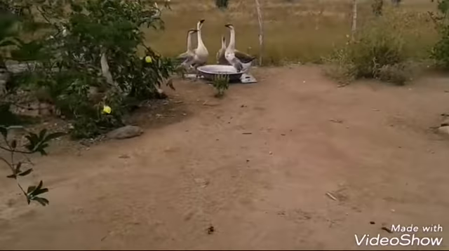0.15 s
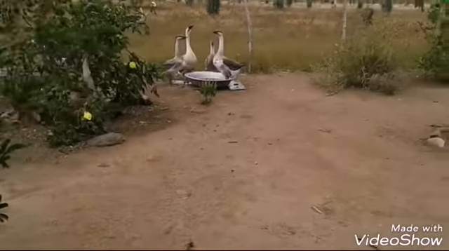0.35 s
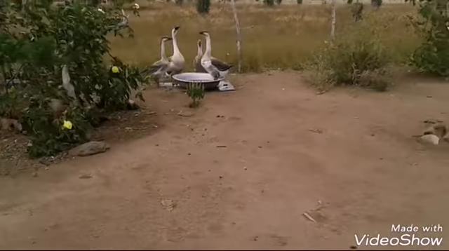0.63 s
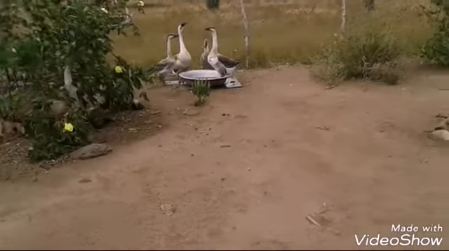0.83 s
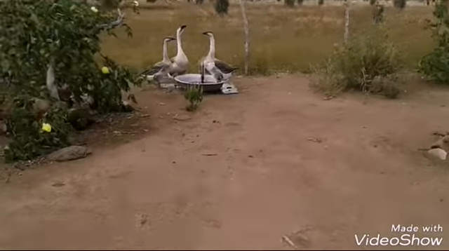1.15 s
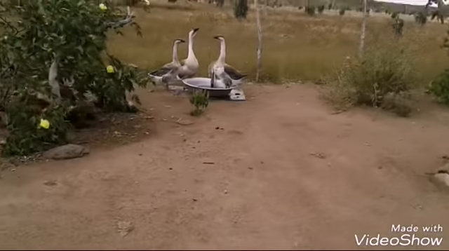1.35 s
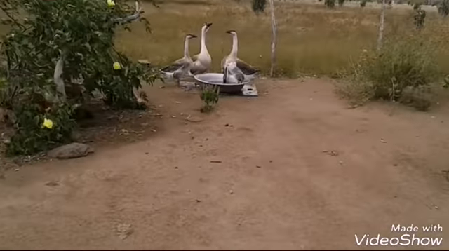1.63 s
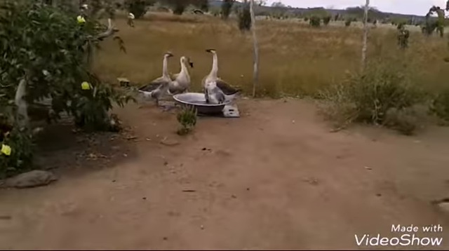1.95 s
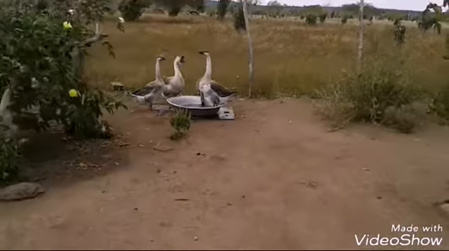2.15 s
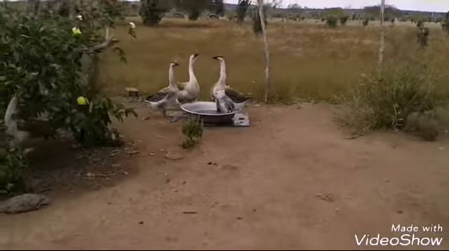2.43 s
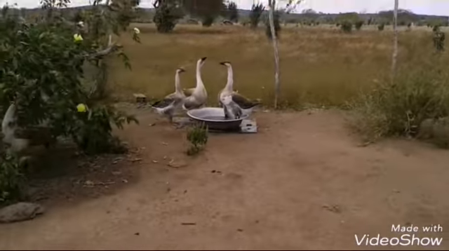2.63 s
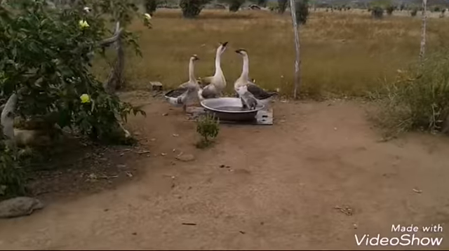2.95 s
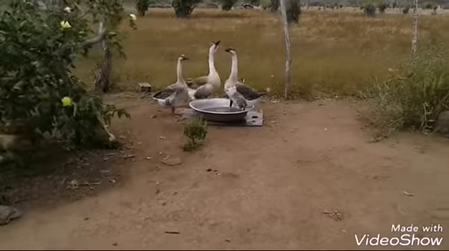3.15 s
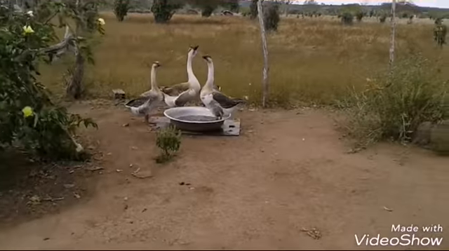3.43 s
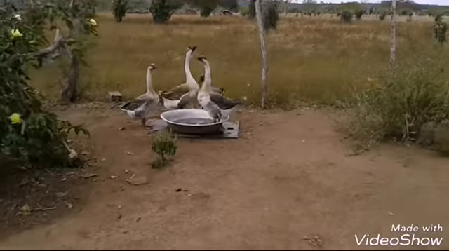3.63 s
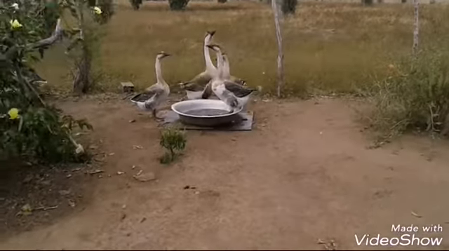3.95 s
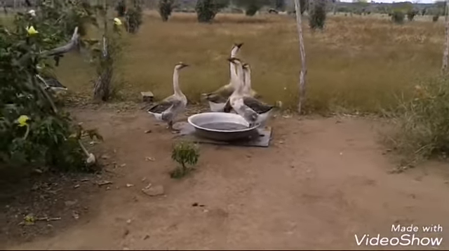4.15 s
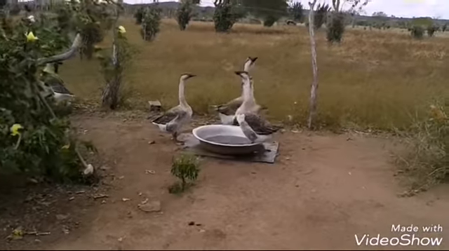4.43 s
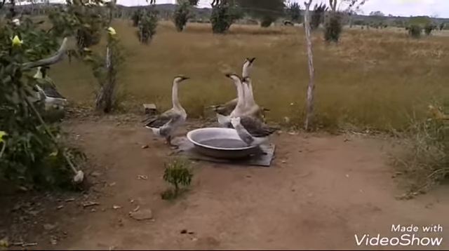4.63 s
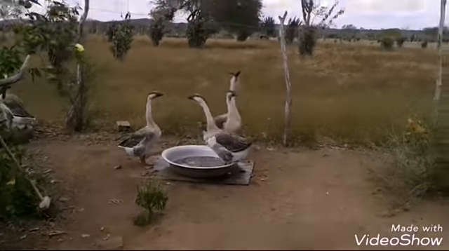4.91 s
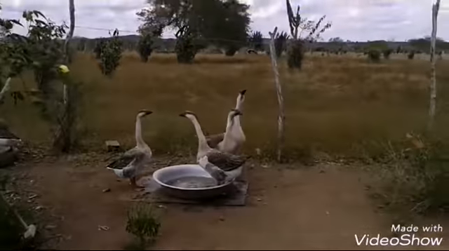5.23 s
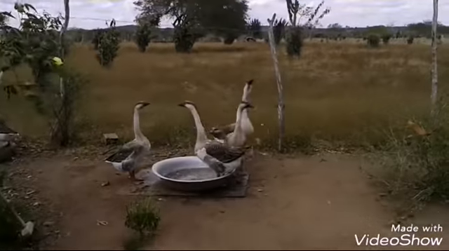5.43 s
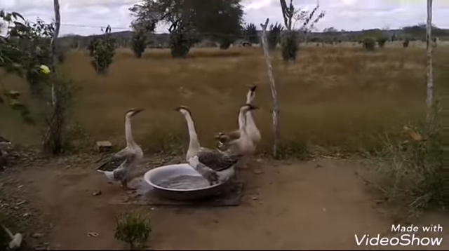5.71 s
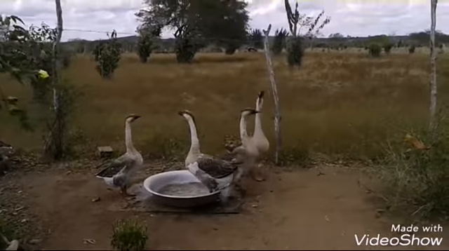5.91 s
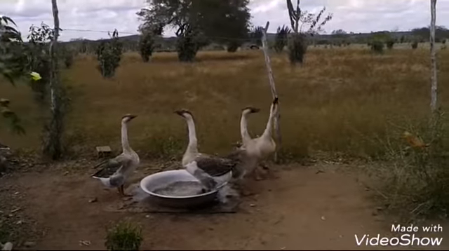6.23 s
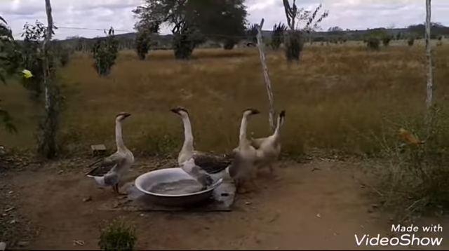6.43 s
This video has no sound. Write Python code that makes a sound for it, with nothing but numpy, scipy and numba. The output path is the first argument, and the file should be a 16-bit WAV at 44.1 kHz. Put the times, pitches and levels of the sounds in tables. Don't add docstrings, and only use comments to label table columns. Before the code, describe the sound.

Outdoor hand-held pickup, walking toward geese. Two isolated buzzy honks, a pause with crunching steps and wind bumps, then honks and clear brassy calls in quick overlapping clusters, with soft closed-beak murmurs between. The strongest trumpet call and hoarse honks come near the end. Sharp dry clicks underfoot stay close; the voices have short dull reflections and no long reverberation.

```python
import sys
import numpy as np
from scipy import signal
from scipy.fft import rfft, irfft, next_fast_len
from scipy.io import wavfile
from scipy.ndimage import uniform_filter1d
from numba import njit

SR = 44100
rng = np.random.default_rng(int(sys.argv[2]) if len(sys.argv) > 2 else 0)


def nominal_scale(level):
    x = np.asarray(level, float) / 20
    return 10 ** x


def generate_wav(signal):
    frames = np.transpose(np.atleast_2d(signal))
    scaled = np.clip(frames, -1, 1) * 32767
    pcm = np.round(scaled).astype(np.int16)
    wavfile.write(sys.argv[1], SR, pcm)


N = 289737

# [f/Hz, level/dB per Hz]
AIR_COLOUR = [(120, -42), (200, -8), (428, -9.5), (461, -2.5), (573, -6.5), (2990, -15), (5140, -22),
              (9360, -21), (15300, -16)]
# [loudest t/s, level/dB, t/s to gain 10 dB, t/s to lose 10 dB]
GUSTS = [(.18, -56, .06, .2), (.41, -44, .05, .2), (.73, -36.5, .07, .02), (.84, -38, .1, .07),
         (1.02, -50, .05, .08), (1.3, -63, .15, .1), (1.39, -41, .03, .06), (1.46, -39.5, .1, .018),
         (1.79, -46, .022, .5), (2.07, -47, .08, .012), (2.175, -39, .015, .04), (2.37, -45, .18, .025),
         (2.5, -73, .05, .3), (3.05, -61, .22, .1), (3.42, -57, .12, .18), (3.68, -50, .045, .05),
         (3.92, -42, .06, .16), (4.1, -42, .02, .38), (4.59, -38, .055, .04), (4.9, -47, .24, .05),
         (5.0, -40, .02, .08), (5.21, -42, .09, .08), (5.43, -44, .037, .11), (5.92, -53, .08, .03),
         (6.09, -58, .08, .2), (6.31, -52, .15, .08), (6.56, -64, .1, .1)]
# [f/Hz, level/dB per Hz]
WIND_COLOUR = [(12, -45), (20, -21), (71, -1.5), (128, 2.5), (240, -10), (369, -25.5), (536, -24),
               (700, -23), (910, -68), (1540, -120)]
# [loudest t/s, level/dB, t/s to gain 10 dB, t/s to lose 10 dB]
FOOTFALLS = [(.22, -55, .08, .05), (.62, -57, .2, .4), (1.1, -54, .05, .08), (1.43, -65, .2, .12),
             (1.9, -51, .12, .13), (2.23, -49, .06, .08), (2.38, -56, .1, .08), (2.495, -51, .015, .08),
             (2.535, -48, .025, .05), (2.87, -58, .04, .08), (3.0, -59, .06, .15), (3.206, -52, .004, .045),
             (3.42, -52, .2, .2), (3.64, -50, .15, .12), (3.81, -52, .07, .25), (4.01, -54, .1, .13),
             (4.19, -44, .025, .03), (4.29, -51, .06, .55), (4.6, -58, .2, .03), (4.78, -49, .1, .06),
             (5.03, -49, .35, .05), (5.3, -58, .3, .1), (5.38, -45, .04, .08), (5.638, -37.5, .025, .06),
             (5.72, -50, .05, .2), (6.26, -48, .25, .08), (6.4, -54, .03, .06), (6.55, -56, .025, .2)]
# [f/Hz, level/dB per Hz]
GRIT_COLOUR = [(530, -10.5), (900, -9.5), (1730, -8), (2240, -6), (3200, -6), (4200, -3), (5650, 0),
               (6990, -9.5), (14200, -20.5), (15300, -34)]
# [t/s, peak level/dB, ring f/Hz]
SNAPS = [(0.523, -33, 5300), (.384, -37, 5600), (.4848, -34, 5800), (.9492, -32, 4960), (1.7665, -30, 5600),
         (1.914, -27, 3500), (1.924, -26, 5000), (1.9889, -28, 4300), (2.8504, -29, 5700),
         (2.924, -32, 5000), (3.004, -33, 5500), (4.475, -30, 4800), (4.585, -26, 6500), (.255, -30, 6000),
         (6.5335, -36, 4840), (6.55, -32, 5970), (4.015, -30, 4800), (1.041, -30, 5740),
         (1.9694, -33, 4960), (2.138, -29, 5030), (2.1809, -40, 4870), (2.4901, -18, 5300),
         (2.524, -21, 5600), (2.536, -21, 5200), (2.802, -33, 5500), (2.547, -20, 5000), (2.617, -26, 5200),
         (2.563, -28, 5260), (2.5845, -25, 4900), (1.0954, -28, 4900), (2.0497, -31, 5270),
         (3.22, -27, 5500), (3.243, -30, 5470), (3.256, -29, 5020), (5.2874, -28, 4940), (5.578, -25, 5040),
         (5.9948, -29, 3570), (3.028, -33, 4200), (3.146, -28, 4600), (3.2014, -25, 2700),
         (3.6138, -35, 2380), (3.9697, -22, 4410), (3.9963, -22, 5100), (4.0455, -23, 6200),
         (4.185, -19, 5050), (4.513, -34, 4900), (4.555, -36, 4920), (4.6892, -21, 4600),
         (4.8888, -29, 3250), (5.179, -29, 5420), (5.271, -32, 5000), (5.3986, -11, 4300),
         (5.5889, -16.5, 4790), (5.6161, -21, 5000), (5.6301, -18, 5700), (6.0955, -22, 4900),
         (6.3275, -40, 4510)]
# [t/s, peak level/dB, f/Hz]
CASE_KNOCKS = [
    (0.716, -29, 123),
    (5.398, -26, 463),
]
# [delay t/s, level/dB]
ECHOES = [
    (.011, -8),
    (.0187, -11),
    (0.027, -13),
    (.053, -22),
    (.087, -32),
]

# [t/s, f/Hz, level/dB]
WHISTLES = [
    [(0.855, 3050, -62), (0.878, 2900, -55), (0.895, 2000, -60), (0.91, 1930, -60), (0.955, 2100, -64)],
    [(5.1, 2420, -68), (5.18, 2430, -63), (5.25, 2440, -69)],
    [(2.2, 1290, -56), (2.25, 1385, -44), (2.31, 1395, -47), (2.37, 1330, -54)],
    [(2.23, 1000, -54), (2.32, 1010, -46), (2.375, 985, -39), (2.405, 930, -46)],
    [(3.41, 2190, -48), (3.46, 2170, -40), (3.51, 2090, -46)],
    [(3.5, 3560, -52), (3.535, 3680, -43), (3.56, 3660, -52)],
    [(3.27, 1310, -52), (3.285, 1350, -47), (3.305, 1370, -54)],
    [(2.92, 975, -60), (2.972, 945, -53)],
    [(1.688, 1330, -56), (1.702, 1350, -50), (1.725, 1400, -54)],
    [(.088, 1280, -58), (.105, 1350, -52), (.125, 1380, -56)],
]
# [start t/s, swell t/s, fade t/s, peak level/dB, f/Hz]
MURMURS = [
    (3.88, .1, .12, -57, 311),
    (4.42, .08, .015, -54, 378),
    (4.84, .12, .015, -51, 484),
    (5.28, .15, .015, -49, 500),
]
MURMUR_SAG = (.13, .15)
# [start t/s, swell t/s, fade t/s, peak level/dB, f/Hz]
GRUNTS = [
    (3.37, .25, .14, -43.5, 161),
    (5.7, .13, .11, -45, 140),
    (6.08, .17, .2, -47, 160),
]
# [second level/dB, third level/dB]
GRUNT_OVERTONES = [(1.5, -11), (-9, -25), (-6, -8)]
GRUNT_SAG = (.27, .22)

# [t/s, f/Hz, level/dB]
CLEAR_CALLS = [
    [(2.163, 685, -64), (2.18, 716, -54), (2.216, 809, -45), (2.256, 842, -39), (2.308, 850, -33.5),
     (2.36, 842, -33.5), (2.38, 845, -39), (2.4, 810, -54)],
    [(3.778, 1090, -37), (3.808, 1104, -34.5), (3.89, 1126, -34), (3.925, 1095, -35), (3.945, 1070, -38),
     (3.965, 1060, -48)],
    [(5.258, 850, -52), (5.32, 890, -38), (5.38, 935, -28), (5.44, 960, -23.5), (5.518, 934, -25),
     (5.54, 860, -37), (5.575, 815, -54)],
    [(3.33, 930, -42), (3.474, 952, -25.5), (3.538, 911, -35), (3.6, 897, -38)],
    [(3.66, 749, -50), (3.728, 734, -33.5), (3.785, 775, -27), (3.805, 780, -40)],
    [(4.69, 748, -51.5), (4.742, 701, -34), (4.8, 858, -49)],
    [(2.968, 822, -42), (2.978, 824, -35), (2.995, 836, -37), (3.012, 860, -35), (3.02, 930, -32),
     (3.032, 960, -42)],
    [(3.755, 988, -35), (3.791, 955, -28), (3.805, 1005, -40)],
    [(4.505, 890, -20), (4.529, 869, -43), (4.545, 876.5, -49)],
    [(5.985, 890, -52), (6.005, 880, -42), (6.031, 815, -38), (6.06, 745, -39), (6.095, 700, -38)],
    [(3.93, 960, -38), (3.95, 934, -29), (3.978, 880, -39), (4.0, 880, -46)],
]
# [second level/dB, third level/dB, rattle level/dB,
# beak level/dB, share of the effort swing that the overtones follow]
CLEAR_VOICE = [(-6, -13, -11, -6, .1), (6.5, -6, -7, -8, 1.4), (-10, -34, -10, -12, .8),
               (-16, -35, -9, -14, .8), (-28, -12, -17, -19, .7), (-8, -19, -6, -1, .7),
               (-13, -15, -22, -9, .7), (-14, -18, -21, -7, 1.1), (-22, -50, -7, -19, .7),
               (-8, -25, -3, -8, .7), (-18, -30, -12, -15, .7)]
CLEAR_DIVIDER = [3, 8, 6, 6, 6, 5, 6, 6, 5, 6, 6]
CLEAR_ROUGH = [.27, .45, .35, .3, .4, .4, .12, .4, .3, .45, .4]
CLEAR_THROAT = [1.25, 0.824, 0.96, 0.963, 1.29, 1.12, 1.035, 1.045, 0.88, 1.03, 1.02]
CLEAR_SHINE = [3, -2, -6, -6, -3, 1, 5, -5, -1, 0, -8]
# lines at 1.5 and 2.5 times the pitch, per clear call [level/dB]
CLEAR_HALVES = [-50, -34, -25, -36, -40, -40, -50, -40, -40, -40, -40]
# [f/Hz, width f/Hz, level/dB]
MID_MODES = [(1540, 300, -4), (1977, 83, 1), (2200, 110, 3), (2750, 200, -10)]
# [f/Hz, width f/Hz, level/dB]
BEAK_MODES = [(3320, 260, 4.5), (3778, 86, 8), (4240, 227, 11), (4990, 260, 10), (5550, 220, 5),
              (6430, 180, -5.5)]
# [f/Hz, width f/Hz, level/dB]
OPEN_BEAK = [(3300, 900, 9), (4270, 900, 15), (5000, 900, 14)]

# [start t/s, swell t/s, fade t/s, peak level/dB, pulse rate f/Hz]
HONKS = [(0.088, .13, .065, -34.5, 139), (0.566, .066, .14, -32, 141), (1.705, .17, .105, -34.5, 143),
         (3.014, .025, .07, -37, 142), (3.268, .1, .05, -37, 152), (3.58, .03, .14, -36.5, 160),
         (3.97, .01, .12, -40, 137), (4.52, .068, .035, -31, 166), (4.76, .04, .06, -35.5, 140),
         (4.828, .15, .09, -25, 154), (5.703, .145, .075, -27.5, 129), (6.085, .17, .09, -24, 163),
         (6.3, .06, .075, -30.5, 150)]
HONK_ROUGH = [.1, .13, .11, .22, .35, .5, .55, .25, .35, .3, .11, .13, .28]
# [share of rate lost at start, at end, swell level/dB]
HONK_SHAPE = [(.08, .05, 14), (.07, .07, 9), (.07, .01, 14), (.05, .07, 3), (.1, .05, 8), (.05, .1, 3),
              (.05, .07, 1), (.1, .07, 6), (.08, .07, 4), (.1, .07, 10), (.075, .03, 8), (.13, .01, 8),
              (.03, .07, 4)]
# [throat f/Hz by neck stretch, middle band level/dB, beak band level/dB]
POSTURE = [(1085, -10, -4), (1030, -12, -5), (1020, -10, -5), (850, -9, -2), (915, -7, -15), (880, -3, -5),
           (920, -12, -8), (925, -9, -1), (835, -11, -8), (920, -8, -4), (892, -8, -1), (910, -7, -3),
           (915, -4, .4)]
# [lower f/Hz, upper f/Hz, upper level/dB]
WINDPIPE = [(2150, 2750, 2), (2000, 2800, 2), (1400, 2240, 3), (1750, 2150, 4), (1350, 2150, 4),
            (1500, 2240, 8), (1900, 2240, 0), (1750, 2150, 3), (1460, 2150, -3), (1600, 2070, 3),
            (1640, 2000, -4), (1480, 2300, -4), (1350, 2400, 0)]
# [low f/Hz, its level/dB, middle f/Hz, high f/Hz, its level/dB]
MOUTH = [(3850, -2, 4300, 4820, 1), (3400, -8, 4130, 4800, -3), (3600, -3, 4600, 4150, -3),
         (3530, -3, 4050, 5000, -4), (3530, 0, 4130, 5000, -3), (3900, 3, 4650, 5600, -2),
         (3500, -4, 4200, 5000, 0), (3100, -3, 3960, 4910, 0), (3100, -3, 4130, 4910, -2),
         (3400, -2, 4220, 5250, -3), (3190, -10, 4130, 5080, 0), (3950, -4, 4950, 5400, -2),
         (3360, -4, 4480, 4910, -6)]
THROAT_SAG = (.07, .08)
# [f/Hz, width f/Hz, level/dB]
LOW_OVERTONE = (1520, 300, -5)
# [f/Hz, width f/Hz, level/dB]
NOSTRIL = (6150, 300, -12)
# [f/Hz, width f/Hz, level/dB]
RASP = (8200, 2200, -36)
# [f/Hz, width f/Hz, level/dB]
SPREAD = (3600, 4000, -17)


def drift(size, rate):
    r = np.exp(-32 * np.pi * rate / SR)
    draws = rng.standard_normal(size // 16 + 502)
    slow = signal.lfilter([1], [1, -2 * r, r * r], draws)[500:]
    return np.interp(np.arange(size) / 16, np.arange(len(slow)), slow / slow.std())


def coloured(x, spectrum):
    hz, db = np.transpose(spectrum)
    size = next_fast_len(N, True)
    bins_hz = np.arange(size // 2 + 1) * SR / size
    gain = nominal_scale(np.interp(np.log(bins_hz + 1), np.log(hz), db))
    shaped = irfft(rfft(x, size) * gain, size)[:N]
    return shaped / shaped.std()


def even(x, span_s=0.0272):
    return x / np.sqrt(uniform_filter1d(x ** 2, int(span_s * SR)) + 1e-12)


@njit
def resonate(x, hz, width_hz):
    r, y = np.exp(-np.pi * width_hz / SR), np.zeros(len(x))
    for i in range(2, len(x)):
        driven = (1 - r * r) / 2 * (x[i] - x[i - 2])
        y[i] = driven + 2 * r * np.cos(2 * np.pi * hz[i] / SR) * y[i - 1] - r * r * y[i - 2]
    return y


def bursts(rows):
    t, power = np.arange(0, N + 32, 32) / SR, 0
    for s, db, rise_s, fall_s in rows:
        away = np.maximum((s - t) / rise_s, (t - s) / fall_s)
        power = power + nominal_scale(db - 10 * away) ** 2
    return np.interp(np.arange(N) / SR, t, np.sqrt(power))


def knocks(events, cycles, crack, band_hz):
    size = 4000
    out, t = np.zeros(N + size), np.arange(size) / SR
    band = signal.butter(2, band_hz, "band", fs=SR)
    cracks = signal.lfilter(*band, rng.standard_normal((len(events), size)))
    for (s, db, hz), noise in zip(events, cracks):
        start = round(s * SR)
        ring = np.sin(2 * np.pi * hz * t) + crack * noise
        out[start:start + size] += nominal_scale(db) * ring * np.exp(-t * hz / cycles)
    return out[:N]


def open_air():
    return nominal_scale(-62.5) * coloured(rng.standard_normal(N), AIR_COLOUR)


def mains_hum():
    level = nominal_scale(-69.5 + 0.68 * drift(N, 8))
    return np.sqrt(2) * level * np.sin(2 * np.pi * 120 * np.arange(N) / SR)


def wind():
    lumps = coloured(rng.standard_normal(N), WIND_COLOUR) * nominal_scale(3.85 * drift(N, 26.7))
    return nominal_scale(-3.5) * bursts(GUSTS) * lumps


def case_knocks():
    return knocks(CASE_KNOCKS, cycles=0.83, crack=5.3, band_hz=[100, 450])


def grit():
    born = rng.random(N) < 3500 * nominal_scale(6 * drift(N, 25)) / SR
    sizes = nominal_scale(2.3 * np.minimum(rng.exponential(1, N), 5))
    grains = born * sizes * rng.choice([-1, 1], N)
    crunch = coloured(grains + 0.21 * rng.standard_normal(N), GRIT_COLOUR)
    crunch = crunch + nominal_scale(-2.5) * resonate(crunch, np.full(N, 5300.), 1620.0)
    return nominal_scale(6.1) * bursts(FOOTFALLS) * crunch


def snaps():
    return nominal_scale(-7) * knocks(SNAPS, cycles=8, crack=1.5, band_hz=[2200, 6600])


def columns(rows, round_s=.015):
    s, *cols = np.transpose(rows)
    at = np.arange(round(s[0] * SR), min(round(s[-1] * SR), N))
    span = int(round_s * SR)
    return at[0], [uniform_filter1d(np.interp(at / SR, s, c), span, mode="nearest") for c in cols]


def arch(start_s, swell_s, fade_s, db, swell_db_per_s):
    t = np.arange(round((swell_s + fade_s) * SR)) / SR
    before = np.clip(1 - t / swell_s, 0, 1) ** 1.7
    after = np.clip((t - swell_s) / fade_s, 0, 1)
    level = db - swell_db_per_s * swell_s * before - 30 * after ** 2.4
    return round(start_s * SR), level, before, after


def sagged(hz, sag, before, after):
    return hz * (1 - sag[0] * before - sag[1] * after)


def add(out, start, x, attack_s=.011, release_s=.02):
    k = np.arange(len(x)) / SR
    out[start:start + len(x)] += x * np.clip(np.minimum(k / attack_s, k[::-1] / release_s), 0, 1)


def soft_tone(hz, levels):
    turn = 2 * np.pi * np.cumsum(hz) / SR
    partials = [nominal_scale(db + 3.2 * drift(len(hz), 58)) * np.sin((k + 1) * turn) for k, db in enumerate(levels)]
    return np.sqrt(2) * sum(partials)


def whistles():
    out = np.zeros(N)
    for start, (hz, db) in map(columns, WHISTLES):
        add(out, start, soft_tone(hz, [db]))
    return out


def murmurs():
    out = np.zeros(N)
    for *shape, hz in MURMURS:
        start, db, *off = arch(*shape, swell_db_per_s=70)
        add(out, start, soft_tone(sagged(hz, MURMUR_SAG, *off), [db]))
    return out


def grunts():
    out = np.zeros(N)
    for (*shape, hz), overtones in zip(GRUNTS, GRUNT_OVERTONES):
        start, db, *off = arch(*shape, swell_db_per_s=60)
        levels = [db, *(db + rel for rel in overtones)]
        add(out, start, soft_tone(sagged(hz, GRUNT_SAG, *off), levels))
    return out


def syrinx(cycles, rough):
    size = len(cycles)
    cycles = cycles + .09 * rough * drift(size, 50)
    closures = np.diff(np.floor(np.maximum.accumulate(cycles)), prepend=0)
    clicks = closures * nominal_scale(6 * rough * drift(size, 120))
    air = rng.standard_normal(size) * np.exp(-1.3 * (cycles % 1))
    return even(clicks + 1e-9, 0.061), even(air)


def tract(x, modes, scale, patchy_db=0):
    out = 0
    for k, (f, width, db) in enumerate(modes):
        rung = resonate(resonate(x, f * scale, 1. * width), f * scale, 2. * width)
        out = out + (-1) ** k * nominal_scale(db + patchy_db * drift(len(x), 12)) * rung
    return even(out)


def rattle(cycles, rough, throat_hz, mid_modes=MID_MODES, beak_modes=BEAK_MODES, rest_hz=930):
    clicks, air = syrinx(cycles, rough)
    voiced = (1 - rough) * clicks + rough * air
    throat = tract(voiced, [(.9, 170, 0), (1.1, 170, 0)], throat_hz)
    throat = even(resonate(throat, throat_hz, 420.))
    chest = tract(voiced, [(630, 170, 0)], np.ones(len(voiced)))
    throat = throat - nominal_scale(-21 - 45 * np.log2(throat_hz / 880)) * chest
    neck = (throat_hz / rest_hz) ** 0.6
    middle = tract(voiced + .18 * air, mid_modes, neck, patchy_db=2.5)
    beak = tract(voiced + .4 * air, beak_modes, neck, patchy_db=2.6)
    return throat, middle, beak


def clear_calls():
    out = np.zeros(N)
    for rows, (*voice, follows), divider, rough, ratio, shine_db, half_db in zip(
            CLEAR_CALLS, CLEAR_VOICE, CLEAR_DIVIDER, CLEAR_ROUGH, CLEAR_THROAT, CLEAR_SHINE, CLEAR_HALVES):
        start, (hz, db) = columns(rows)
        size, top_db = len(hz), db.max()
        second_db, third_db, rattle_db, beak_db = top_db + np.array(voice)
        slack = db - top_db
        thin = follows * slack + 32 * np.log2(hz / hz.max())
        cycles = np.cumsum(hz * (1 + 0.0045 * drift(size, 40))) / SR
        levels = [db, second_db + thin, third_db + thin]
        tone = sum(nominal_scale(d) * np.sin(2 * np.pi * (k + 1) * cycles) for k, d in enumerate(levels))
        halves = np.sin(3 * np.pi * cycles) + np.sin(5 * np.pi * cycles)
        tone = tone + nominal_scale(top_db + half_db + .4 * slack + 4 * drift(size, 15)) * halves
        throat, middle, rasp = rattle(cycles / divider, rough, ratio * hz, rest_hz=ratio * 930)
        overtones = tract(syrinx(cycles, .55 * rough)[0], OPEN_BEAK, np.ones(size))
        beak = (1.6 * rough + .25) * rasp + (1 - rough) * nominal_scale(shine_db) * overtones
        beak = nominal_scale(beak_db + .6 * follows * slack) * beak
        pulses = nominal_scale(rattle_db + .6 * slack) * (throat + .6 * middle)
        add(out, start, np.sqrt(2) * tone + pulses + beak)
    return out


def honks():
    out = np.zeros(N)
    pipe_width_hz, mouth_width_hz = 220, 200
    for (s, swell_s, fade_s, top_db, rate), posture, rough, (*sag, swell_db), pipe, mouth in zip(
            HONKS, POSTURE, HONK_ROUGH, HONK_SHAPE, WINDPIPE, MOUTH):
        throat_hz, mid_db, beak_db = posture
        lower_hz, upper_hz, upper_db = pipe
        low_hz, low_db, middle_hz, high_hz, high_db = mouth
        start, db, *off = arch(s, swell_s, fade_s, top_db, swell_db / swell_s)
        mid_modes = [(lower_hz, pipe_width_hz, 0), (upper_hz, pipe_width_hz, upper_db), LOW_OVERTONE,
                     (1.17 * upper_hz, pipe_width_hz, upper_db - 6)]
        beak_modes = [(low_hz, mouth_width_hz, low_db), (middle_hz, mouth_width_hz, 0),
                      (high_hz, mouth_width_hz, high_db), NOSTRIL, RASP, SPREAD]
        cycles = np.cumsum(sagged(rate, sag, *off)) / SR
        moving_throat_hz = sagged(throat_hz, THROAT_SAG, *off)
        throat, middle, beak = rattle(cycles, rough, moving_throat_hz, mid_modes, beak_modes, throat_hz)
        bright = nominal_scale(.25 * (db - top_db)) * (nominal_scale(mid_db) * middle + nominal_scale(beak_db) * beak)
        add(out, start, nominal_scale(db) * (throat + bright), attack_s=.016)
    return out


def yard(x):
    out = signal.lfilter(*signal.butter(2, 7600, fs=SR), x)
    dull = signal.lfilter([.55], [1, -.45], out)
    for s, db in ECHOES:
        delay = round(s * SR)
        out[delay:] += nominal_scale(db) * dull[:N - delay]
    return out


def scene():
    background = open_air() + mains_hum()
    near = wind() + case_knocks() + grit() + snaps()
    voices = yard(whistles() + murmurs() + grunts() + clear_calls() + honks())
    return (background + near + nominal_scale(-.1) * voices)[None]


def top_cut(x):
    return signal.sosfilt(signal.butter(12, 15100, fs=SR, output="sos"), x)


def record(dry):
    low_pass = signal.cheby2(10, 60, 16100, fs=SR, output="sos")
    mix = signal.sosfilt(low_pass, dry)
    return top_cut(mix)


dry = scene()
out = record(dry)
generate_wav(out)
```